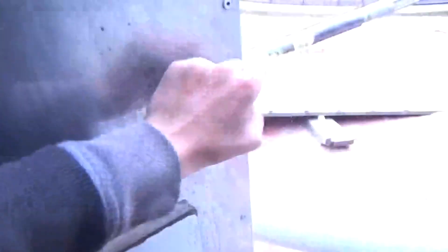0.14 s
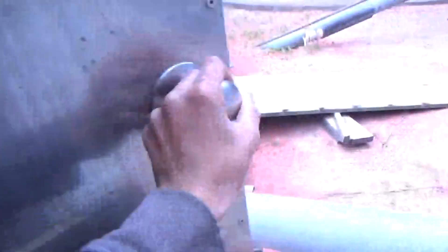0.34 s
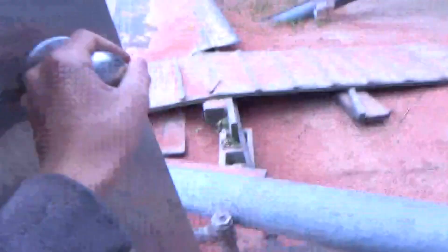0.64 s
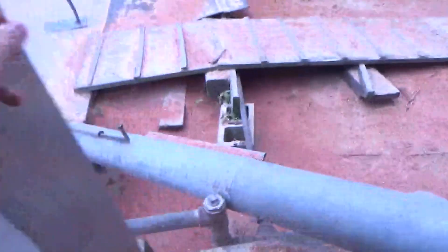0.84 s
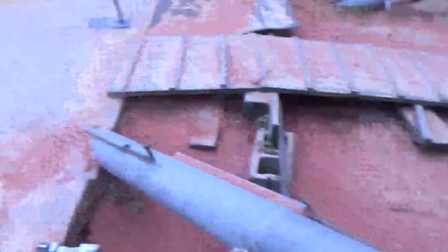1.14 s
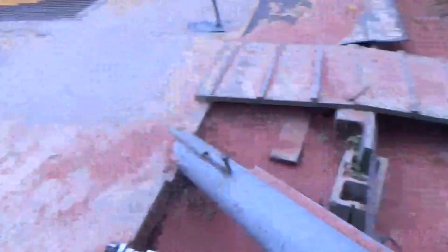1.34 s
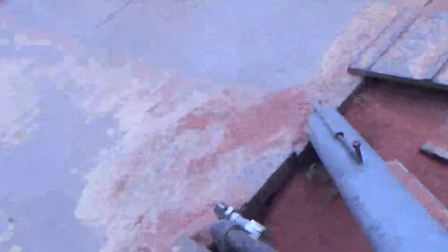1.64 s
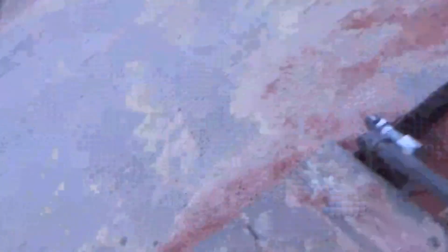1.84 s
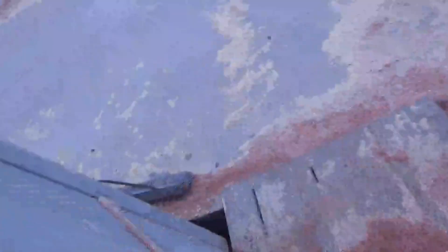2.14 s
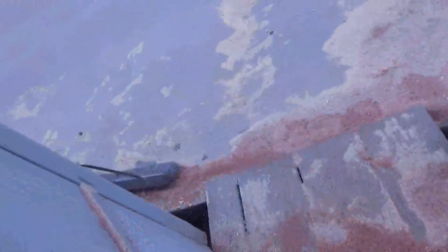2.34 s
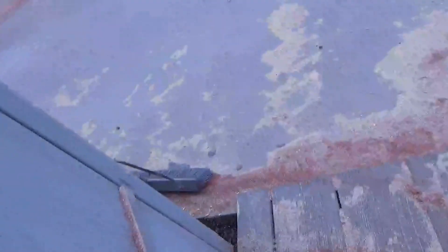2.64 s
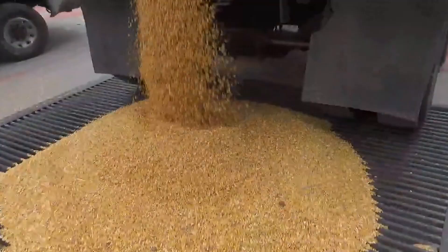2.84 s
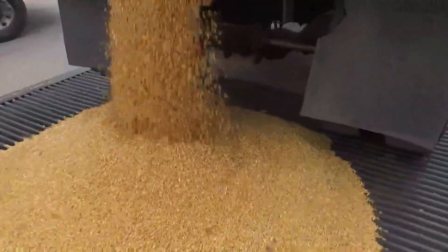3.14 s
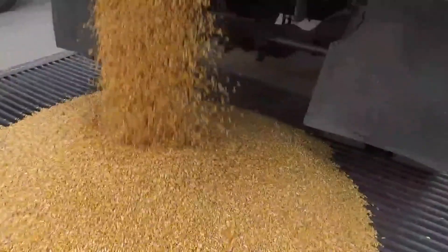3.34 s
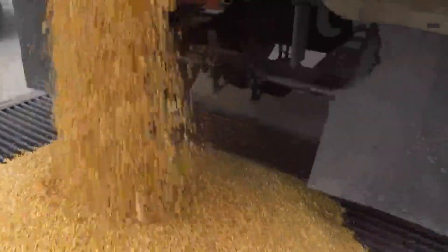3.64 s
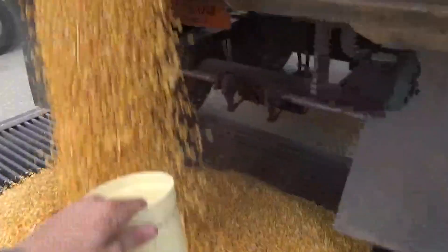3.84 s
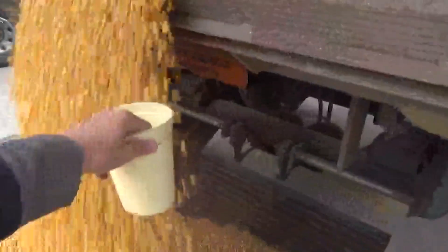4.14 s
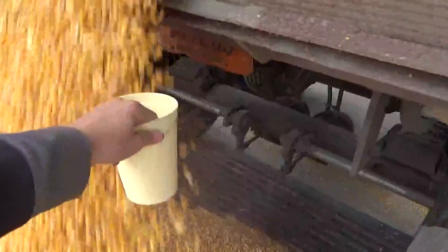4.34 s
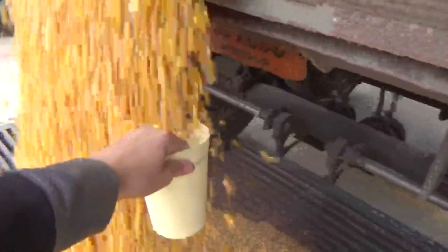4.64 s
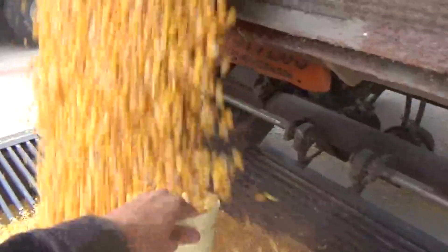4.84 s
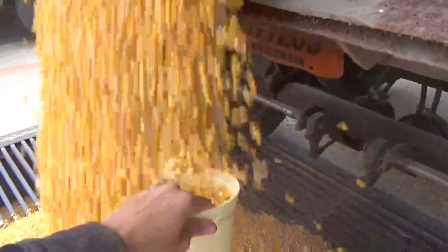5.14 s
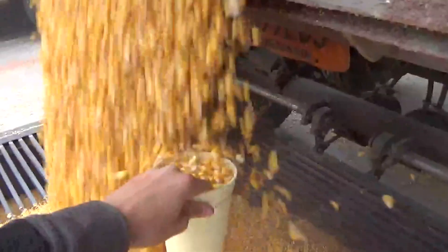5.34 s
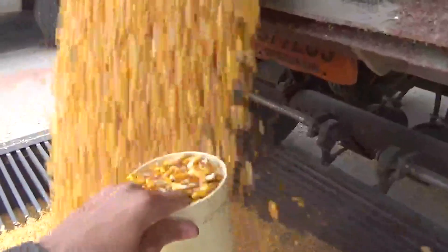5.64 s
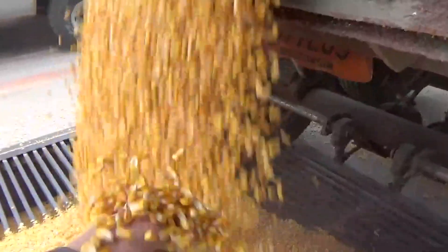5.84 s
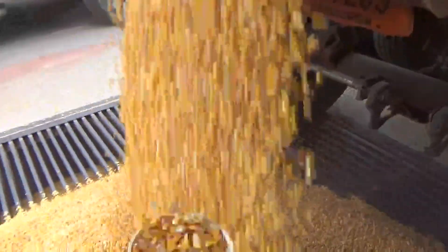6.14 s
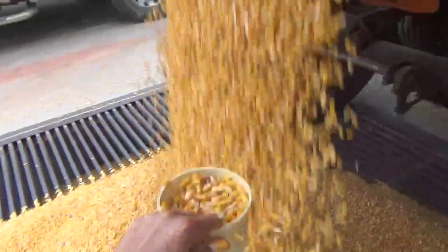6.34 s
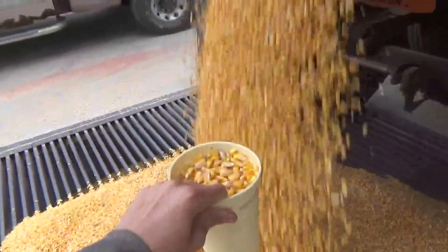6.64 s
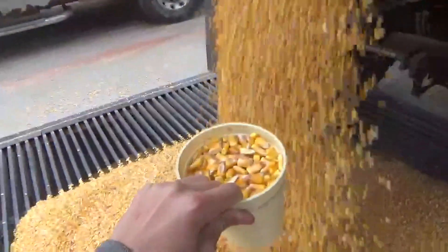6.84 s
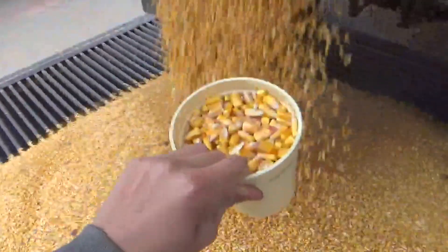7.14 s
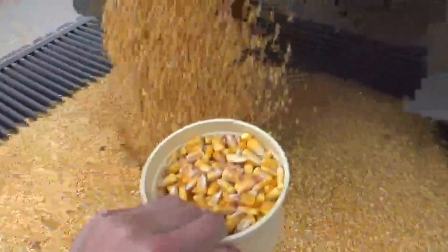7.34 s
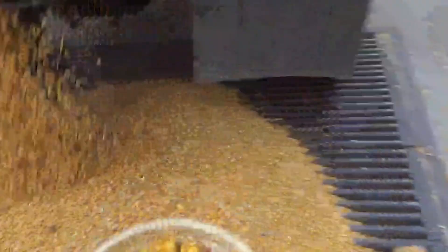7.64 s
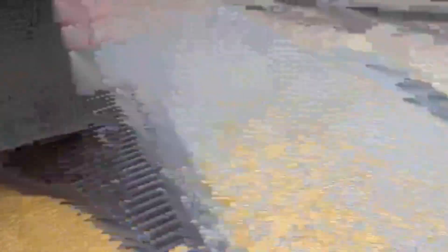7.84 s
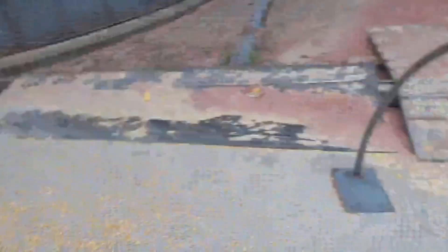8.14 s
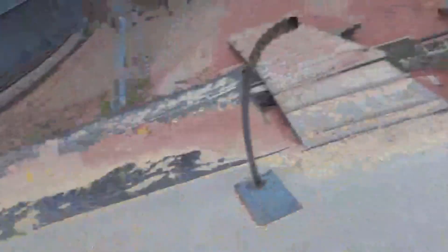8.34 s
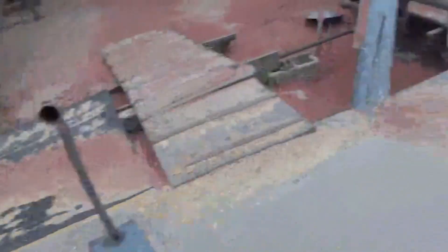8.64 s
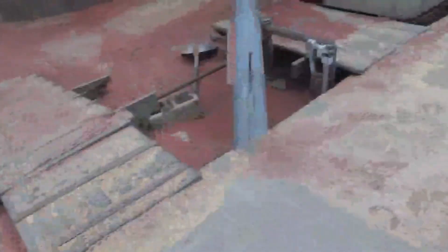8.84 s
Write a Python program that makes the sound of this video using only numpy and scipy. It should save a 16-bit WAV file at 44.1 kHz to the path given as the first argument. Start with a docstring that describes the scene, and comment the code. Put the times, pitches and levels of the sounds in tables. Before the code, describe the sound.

Grain pours with a steady hiss, rattling briefly into a plastic cup, while wind gusts rumble and a conveyor drones far off.

```python
"""A yard with a grated pit, where shelled grain pours from a truck hopper onto a heap.
Countless kernel clicks merge into a bright hiss that shifts as the microphone moves; at 2.9 s a hard cut
turns it suddenly brighter. A plastic cup is held into the stream and fills: a hollow patter, then a
rattle with a climbing pitch. Gusts rumble on the microphone ports; a conveyor drones in the distance."""
import sys
import numpy as np
from scipy import signal
from scipy.fft import rfft, irfft, next_fast_len
from scipy.io import wavfile
from scipy.ndimage import uniform_filter1d

SR = 44100
rng = np.random.default_rng(int(sys.argv[2]) if len(sys.argv) > 2 else 0)


def master(y):
    """Save y as 16-bit WAV."""
    cut = np.clip(np.atleast_2d(y).T, -1, 1)
    pcm = np.round(cut * 32767)  # scale
    wavfile.write(sys.argv[1], SR, pcm.astype(np.int16))


N = 396459

# The hiss shifts as the microphone moves; at 2.9 s a hard cut turns it suddenly brighter. Each row:
# time in seconds, level in dB, treble tilt in dB per 0.37 octave above 8 kHz, left over right in dB.
STREAM_CUES = [(0.0, -26, -1.5, -1.5), (0.3, -28.5, -2.5, -2), (1.3, -30, -0.7, -2), (1.6, -29, -5, -3.5),
               (1.9, -33.5, -0.5, -2), (2.895, -32.5, -0.5, -1.5), (2.91, -34, 7, -0.5),
               (3.2, -32.5, 6.5, 0.5), (3.5, -31, 6, 0), (4.3, -29.5, 2, 1), (4.6, -30.5, -0.5, 0.5),
               (5.4, -29.5, 0.8, 0.5), (6.6, -28.5, 3.5, -1), (7.62, -31.5, 5, 0.5), (7.85, -36, 0.6, 1),
               (8.0, -34.5, 5, -2), (8.5, -32, -3.5, -0.5), (8.99, -28.5, -1.4, 0.5)]
# Tone of the falling kernels. Each row: frequency in Hz, relative level in dB.
STREAM_TONE = [(410, -49), (700, -19.5), (1060, -17.5), (1480, -16.5), (1820, -15.5), (4020, -13),
               (6750, -5.5), (7240, -4.5), (8310, -1), (9990, -6), (11000, -11), (14200, -69),
               (22000, -120)]
# Stereo image of the hiss. Each row: frequency in Hz, left-right likeness (1 is mono).
STREAM_IMAGE = [(700, 0.92), (2500, 0.65), (5200, 0.82), (11000, 0.95)]
# The cup's resonances. Each row: pitch in Hz, width in Hz, gain in dB, bare bottom's share from 0 to 1.
CUP_MODES = [(572, 60, -10, 0.9), (724, 34, -6, 1), (1160, 75, -13.5, 0.82), (1640, 120, -8, 0.97),
             (2720, 230, -3.5, 0.55), (3220, 140, 0, 0.65), (4090, 280, -1.5, 0.29), (4700, 280, 2.5, 0.3),
             (5130, 1440, 1, 0.04)]
# Single kernels on the bare bottom. Each row: time in seconds, strength in dB.
BOTTOM_HITS = [(4.563, -23), (4.599, -23), (4.623, -30), (4.646, -30), (4.673, -38), (4.694, -45),
               (4.754, -49)]
# Glances and spills at the rim, and one low puff of wind. Each row: start in seconds, level in dB,
# decay in seconds, low edge in Hz, high edge in Hz.
BURSTS = [(4.458, -31, .003, 2000, 6000), (4.547, -30, .005, 2000, 6000), (5.901, -35, .022, 2600, 5200),
          (5.905, -36.5, .022, 650, 2400), (6.004, -45, .014, 120, 450), (6.26, -39, .024, 1200, 4500)]
# Gusts on the ports. Each row: start in seconds, hold in seconds, level in dB, tilt in dB per octave.
GUST_CUES = [(2.913, .32, -32.5, -0.3), (3.26, .14, -41, -2), (3.5, .09, -43.5, -2),
             (3.68, 0.056, -41.5, -1.5), (3.838, 0.042, -35.5, -0.2), (3.93, .1, -41.5, 1),
             (4.08, .02, -43, .1), (6.658, .05, -47.5, -0.3), (7.08, .18, -39, -1), (7.381, .05, -36, -0.5),
             (7.592, 0.048, -40, 0.1), (7.7, 0.037, -43, -4), (7.994, .04, -36, -0.5),
             (8.081, 0.092, -34, 0.9), (8.231, .12, -35.5, 1), (8.37, .55, -37.5, 2)]
# The breeze between gusts. Each row: time in seconds, level in dB.
BREEZE_LEVELS = [(0, -64), (2.895, -60), (2.91, -46), (4.2, -51.5), (5.9, -56.5), (6.5, -60), (7.05, -48),
                 (8.99, -46)]
# Tone of the wind rumble. Each row: frequency in Hz, relative level in dB.
WIND_TONE = [(20, -35), (43, -25), (75, -14), (150, -5), (260, -1), (420, 0), (620, -3.5), (900, -8),
             (1400, -15.5), (2500, -17), (3600, -51)]
# Stereo image of the wind. Each row: frequency in Hz, left-right likeness (1 is mono).
WIND_IMAGE = [(60, .78), (130, .72), (270, .45), (600, -.15), (1200, 0), (2500, .2)]
# The conveyor, masked by the truck near the stream. Each row: time in seconds, drone level in dB,
# housing resonance level in dB.
CONVEYOR_LEVELS = [(0, -50.5, -77), (1.0, -55.5, -60.5), (2.5, -49.5, -56.5), (4.4, -56, -65),
                   (5, -63, -78), (6.2, -56, -60.5), (8.99, -46.5, -82)]
# Tone of the conveyor drone. Each row: frequency in Hz, relative level in dB.
CONVEYOR_TONE = [(12, -63), (20, -33), (54, -24), (225, -3), (360, -2.5), (431, -4), (715, -4.5),
                 (1500, -12), (1950, -23), (3300, -120)]

# The cup enters the stream, kernels reach its bottom, they cover it, the cup is full.
ENTER_S, BOTTOM_S, COVERED_S, FULL_S = 4.46, 4.565, 4.77, 5.45
FULL_FADE_DB_PER_S = 110
TURN_AWAY_S, TURN_LENGTH_S = 7.81, 0.56   # the microphone swings off the stream and hears it duller


def grain_stream():
    """Kernels hit the heap and grate; turning the microphone shifts the colour around an 8 kHz peak."""
    level_db, treble_db, pan_db = automation(STREAM_CUES)
    away, = automation([(TURN_AWAY_S, 0), (TURN_AWAY_S + TURN_LENGTH_S, 1)])
    drop_db = -29 - level_db
    body_db = -2.5 + 1.08 * drop_db + 4.5 * away   # the body holds up as the direct hiss drops
    surge_db = 0.5 * drift(40)   # clumps of grain fall together

    def gain_db(hz):
        octaves = np.log2(hz / 8000)
        tilt_db = treble_db * octaves / .37 if octaves > 0 else body_db * min(-octaves, 1)
        return level_db + tilt_db + surge_db + 0.5 * drift(24)
    hits = np.array([clicks(17000, spread_db=2) for _ in range(2)])
    scatter_db = 0.87 * drop_db   # hiss scattered by the yard hardly follows the direct level
    hiss = coloured(hits, STREAM_TONE, STREAM_IMAGE, np.geomspace(800, 11000, 10), gain_db, scatter_db)
    return panned(hiss, pan_db)


def cup():
    """Kernels strike the plastic; the bottom booms until it is covered, the walls rattle on."""
    walls = from_db(envelope_db(ENTER_S, FULL_S, -39, rise=500, sag=4, fade=FULL_FADE_DB_PER_S))
    bottom = from_db(envelope_db(BOTTOM_S, COVERED_S, -39.5, rise=500, sag=27, fade=350))
    hits_per_s, = automation([(ENTER_S, 400), (COVERED_S, 1450)])
    rattle = rms_one(clicks(hits_per_s, spread_db=-0.5))
    lone_hits = np.zeros(N)
    for start, strength_db in BOTTOM_HITS:
        lone_hits[round(start * SR)] = from_db(strength_db)
    out = air_column(rattle)
    for k, (hz, width_hz, mode_db, bottom_share) in enumerate(CUP_MODES):
        uneven = from_db(4.25 * rng.standard_normal(N))   # every hit gets its own colour
        patter = rattle * uneven * ((1 - bottom_share) * walls + bottom_share * bottom)
        damping = np.pi * width_hz / SR
        # Make-up gain keeps narrow resonances as loud as wide ones.
        drive = patter / np.sqrt(damping) + bottom_share * lone_hits / (2 * damping)
        out += (-1) ** k * from_db(mode_db) * resonance(drive, hz, width_hz)
    return out


def air_column(rattle):
    """The air above the grain rings with the rattle, climbing in pitch as the cup fills."""
    start_hz, climb_hz_per_s, width_hz, block = 2700, 3500, 710, 128
    hz = start_hz + climb_hz_per_s * np.maximum(np.arange(N) / SR - BOTTOM_S, 0)
    level_db = envelope_db(COVERED_S, FULL_S, -38.5, rise=32, sag=25, fade=FULL_FADE_DB_PER_S)
    ring, state = np.zeros(N), np.zeros(2)
    for i in range(round(ENTER_S * SR), round((FULL_S + .2) * SR), block):
        span = slice(i, i + block)
        ring[span], state = signal.lfilter([1, 0, -1], poles(hz[i], width_hz), rattle[span], zi=state)
    return from_db(level_db) * ring / ring[ring != 0].std()


def spills_and_puff():
    """Kernels glance off or spill over the rim; one low puff of wind thumps the microphone."""
    out = np.zeros(N)
    t = np.arange(round(.15 * SR)) / SR
    for start, level_db, decay_s, low_hz, high_hz in BURSTS:
        band = signal.butter(2, [low_hz, high_hz], "band", fs=SR, output="sos")
        burst = rms_one(signal.sosfilt(band, rng.standard_normal(len(t))))
        shape = (1 - np.exp(-t / 0.00061)) * np.exp(-(t / decay_s) ** 2)
        out[round(start * SR):][:len(t)] += from_db(level_db) * burst * shape
    return out


def wind():
    """Eddies burst on the microphone ports in a lumpy rumble; the loudest gust sets level and colour."""
    level_db, = automation(BREEZE_LEVELS)
    tilt = np.full(N, -1.5)   # dB per octave
    for start, hold, top_db, gust_tilt in GUST_CUES:
        gust_db = envelope_db(start, start + hold, top_db, rise=600, sag=0, fade=300)
        tilt = np.where(gust_db > level_db, gust_tilt, tilt)
        level_db = np.maximum(gust_db, level_db)
    tilt = uniform_filter1d(tilt, size=900)
    jolt_db = 1.3 * drift(60)   # all bands jolt together
    eddies = np.array([clicks(2500, spread_db=2.5) for _ in range(2)])
    return coloured(eddies, WIND_TONE, WIND_IMAGE, np.geomspace(60, 1600, 4),
                    lambda hz: level_db + tilt * np.log2(hz / 250) + jolt_db + 0.91 * drift(36))


def conveyor():
    """A distant conveyor lays down a broad drone, and its housing adds one hollow note."""
    drone_db, housing_db = automation(CONVEYOR_LEVELS)
    image = [(60, 1.0), (400, 1.0), (1500, 0.44)]   # mono lows, wider top
    drone = coloured(rng.standard_normal((2, N)), CONVEYOR_TONE, image, [100, 400, 1200],
                     lambda hz: drone_db + 2 * drift(5.4))
    housing = rng.standard_normal(N)
    for _ in range(2):
        housing = resonance(housing, hz=424.8, width_hz=21.5)
    return drone + from_db(housing_db) * rms_one(housing)


def from_db(db):
    """Gain of a level in dB."""
    return 10 ** (np.asarray(db) / 20)


def rms_one(x):
    """Scaled to rms 1."""
    return x / np.sqrt(np.mean(x ** 2) + 1e-20)


def automation(rows):
    """One curve for each column after the time, sample by sample."""
    times, *columns = np.transpose(rows)
    return [np.interp(np.arange(N) / SR, times, column) for column in columns]


def envelope_db(start, end, top_db, rise, sag, fade):
    """Rises to top_db at start, sags until end, then fades; slopes in dB per second."""
    t = np.arange(N) / SR
    attack_db = top_db - rise * np.maximum(start - t, 0)
    return attack_db - sag * np.clip(t - start, 0, end - start) - fade * np.maximum(t - end, 0)


def drift(rate_hz):
    """A random wobble of rms about 1: noise through two one-pole low-passes."""
    step, settle = 40, 2000
    r = np.exp(-2 * np.pi * rate_hz * step / SR)
    slow = signal.lfilter([1], [1, -2 * r, r * r], rng.standard_normal(N // step + settle + 2))[settle:]
    return np.interp(np.arange(N) / step, np.arange(len(slow)), rms_one(slow))


def clicks(per_s, spread_db):
    """Random clicks of uneven size and sign."""
    sizes = from_db(spread_db * np.minimum(rng.exponential(1, N), 3.5)) * rng.choice([-1, 1], N)
    return sizes * (rng.random(N) < per_s / SR)


def poles(hz, width_hz):
    """Feedback coefficients of a two-pole ring."""
    r = np.exp(-np.pi * width_hz / SR)
    return [1, -2 * r * np.cos(2 * np.pi * hz / SR), r * r]


def resonance(x, hz, width_hz):
    """A ringing band with gain 1 at its peak."""
    feedback = poles(hz, width_hz)
    return signal.lfilter(np.array([1, 0, -1]) * (1 - feedback[2]) / 2, feedback, x + 1e-18)


def at_hz(points, hz):
    """A curve read on a log frequency axis."""
    knots_hz, values = np.transpose(points)
    return np.interp(np.log(hz), np.log(knots_hz), values)


def coloured(pair, tone, image, centres_hz, gain_db, side_db=0):
    """Shapes a mid-side pair into stereo: fixed tone and width, then each band rides gain_db(hz)."""
    size = next_fast_len(N)
    hz = np.maximum(np.arange(size // 2 + 1) * SR / size, 1)
    alike = np.clip(at_hz(image, hz), -1, 1)
    spectra = rfft(pair, size) * from_db(at_hz(tone, hz)) * np.sqrt([1 + alike, 1 - alike])
    spectra /= np.sqrt(np.mean(irfft(spectra, size) ** 2) * 2)
    position = np.interp(np.log(hz), np.log(centres_hz), np.arange(len(centres_hz)))
    mid_side = np.zeros((2, N))
    for k, centre in enumerate(centres_hz):
        band = np.maximum(1 - abs(position - k), 0)
        mid_side += irfft(spectra * band, size)[:, :N] * from_db(gain_db(centre))
    mid, side = mid_side
    return mid + from_db(side_db) * side * [[1], [-1]]


def panned(x, pan_db):
    """Sets left over right by pan_db, half on each channel."""
    return x * from_db(np.array([pan_db, -pan_db]) / 2)


def scene():
    """Grain hiss over wind and conveyor, with the cup close in front, a touch to the left."""
    return grain_stream() + wind() + conveyor() + panned(cup() + spills_and_puff(), np.full(N, 1.0))


def record(dry):
    """Soft saturation rounds the peaks, and a steep low-pass cuts the top."""
    ceiling, cutoff_hz = .3, 11010
    rounded = ceiling * np.tanh(dry / ceiling)
    return signal.sosfilt(signal.ellip(12, .3, 75, cutoff_hz, fs=SR, output="sos"), rounded)


dry = scene()
out = record(dry)
master(out)
```